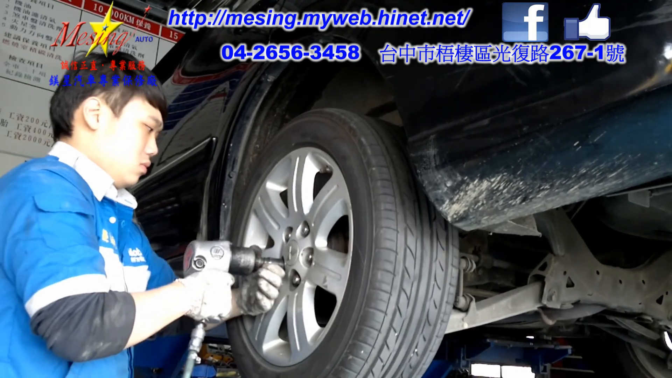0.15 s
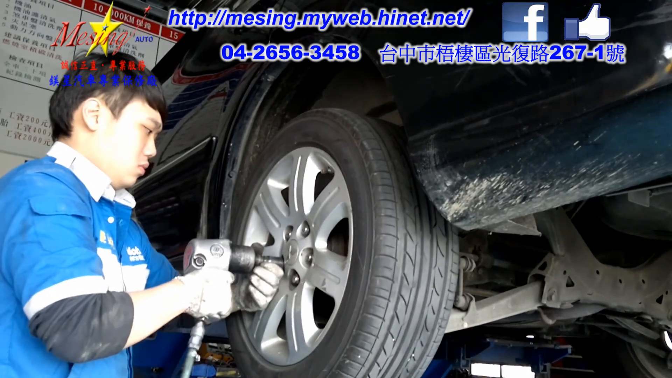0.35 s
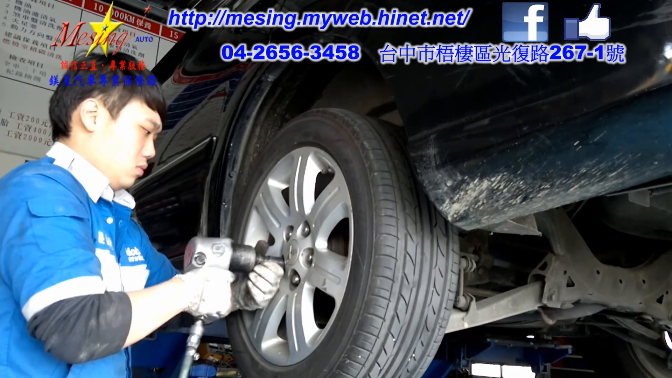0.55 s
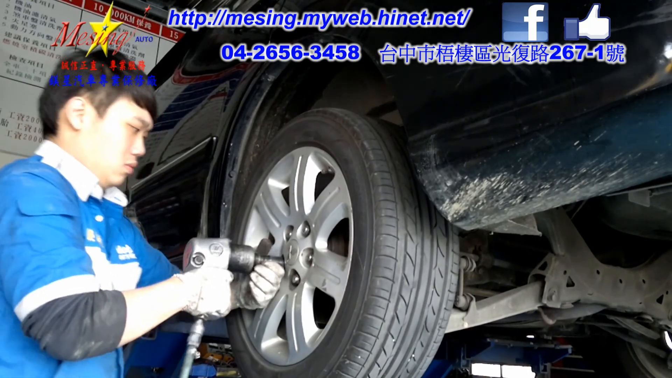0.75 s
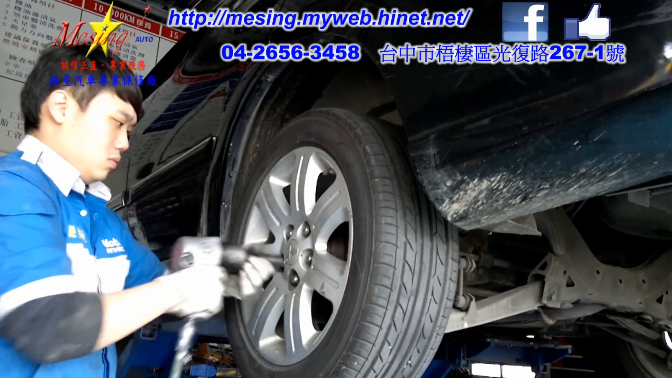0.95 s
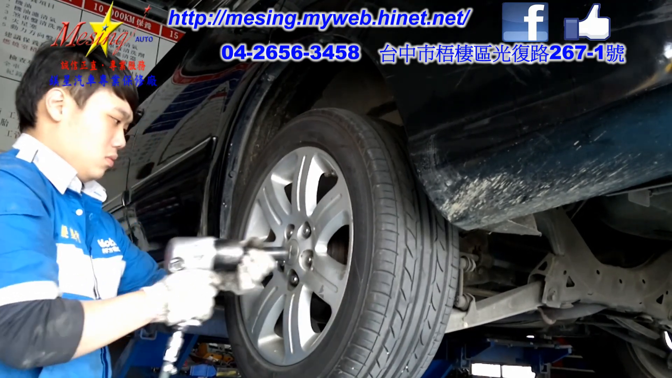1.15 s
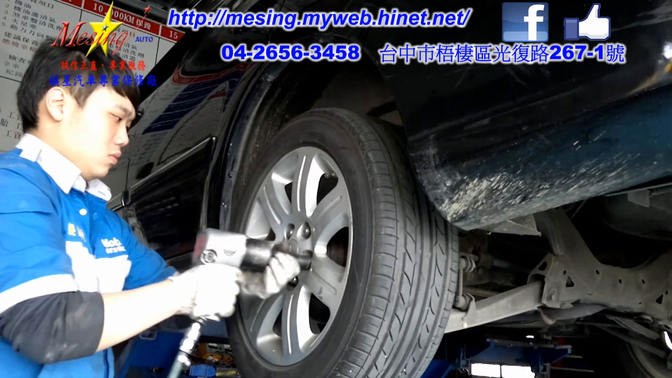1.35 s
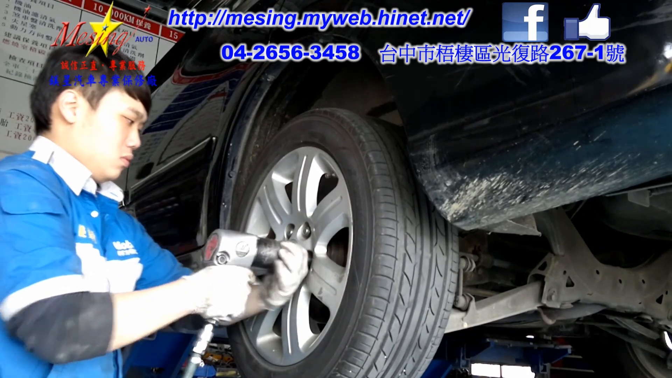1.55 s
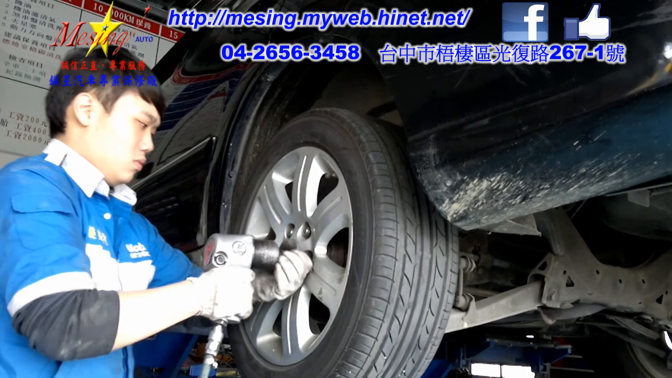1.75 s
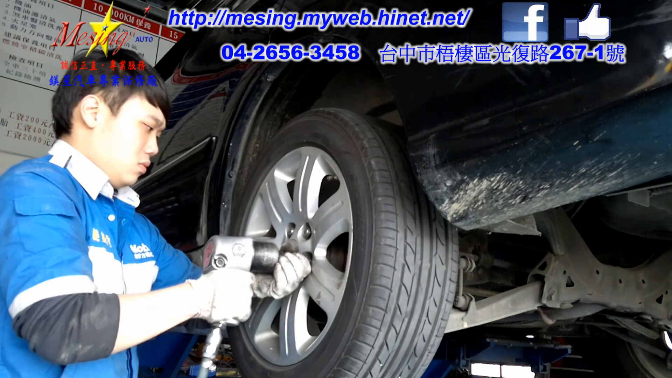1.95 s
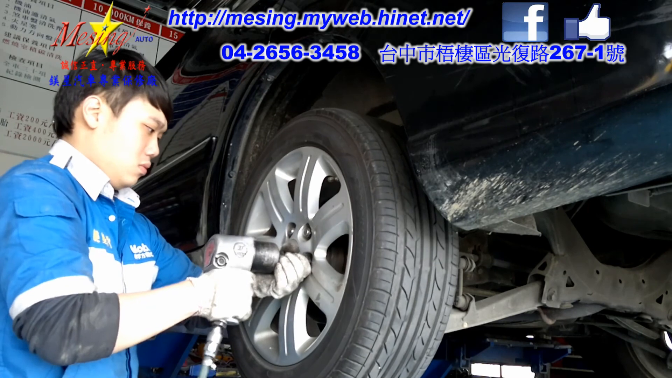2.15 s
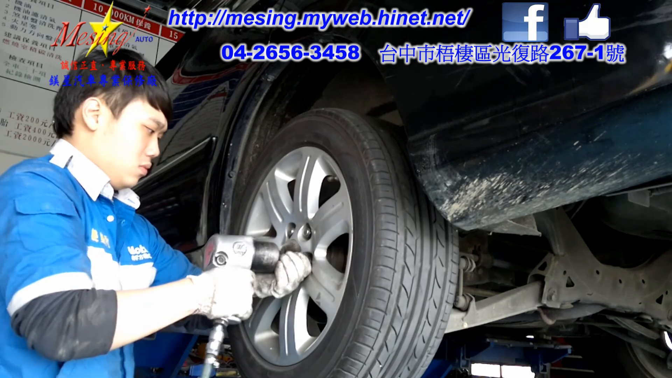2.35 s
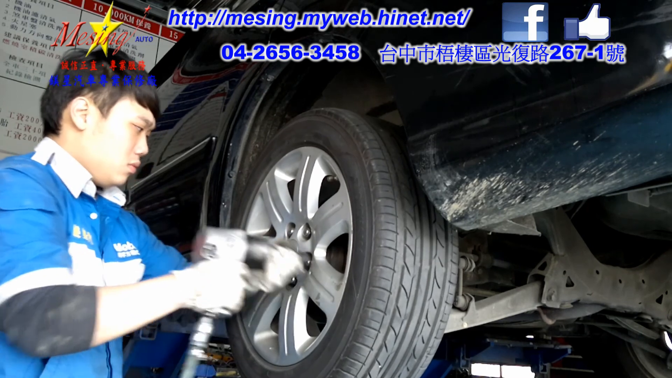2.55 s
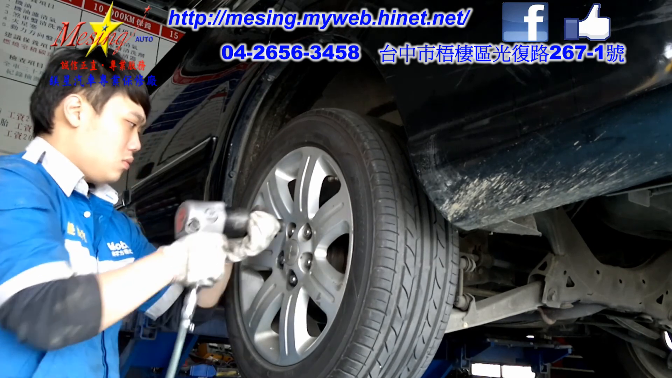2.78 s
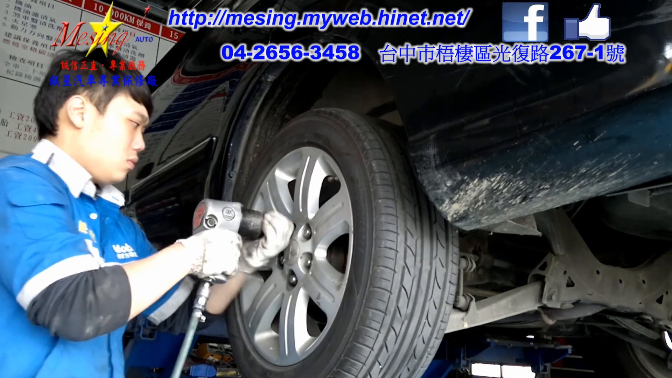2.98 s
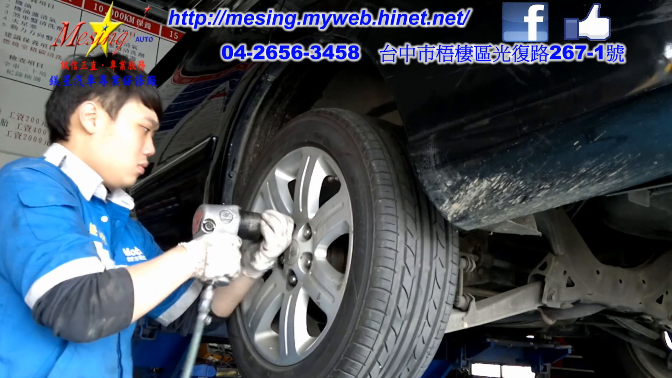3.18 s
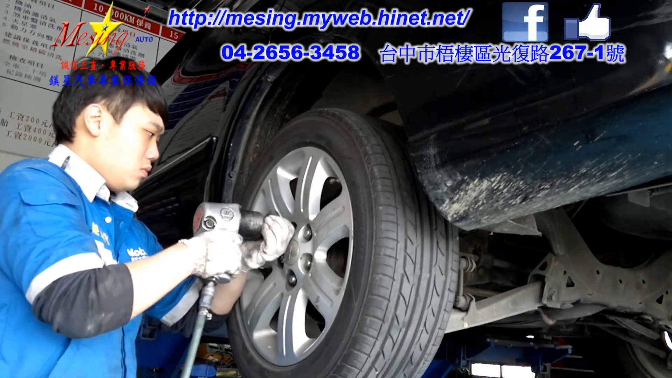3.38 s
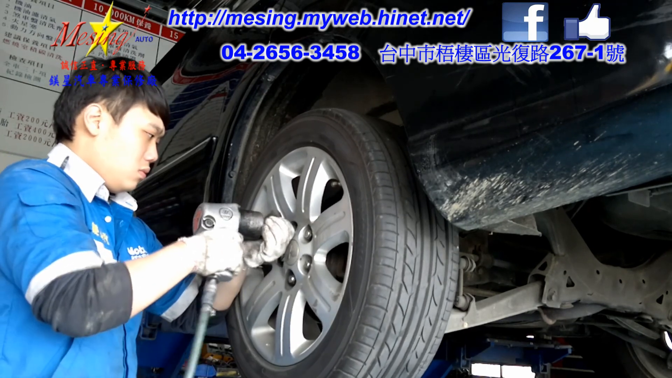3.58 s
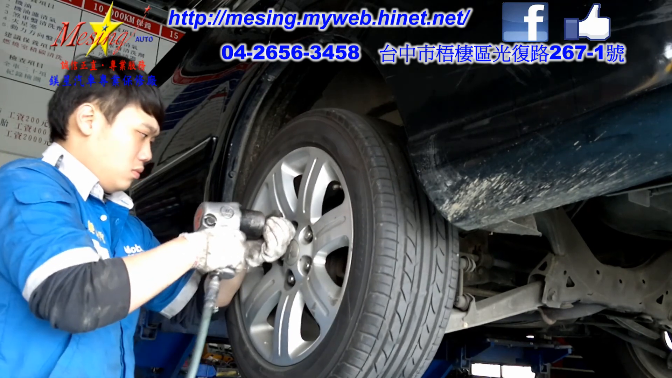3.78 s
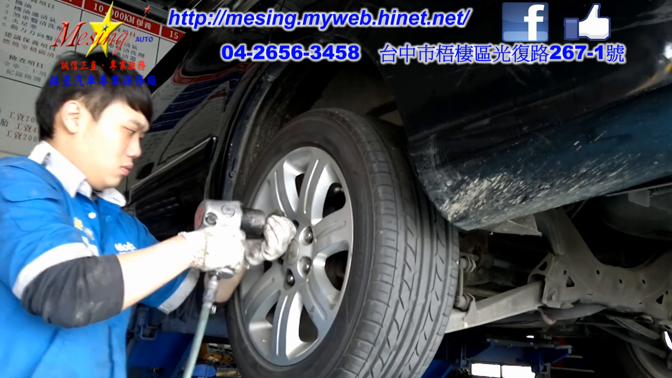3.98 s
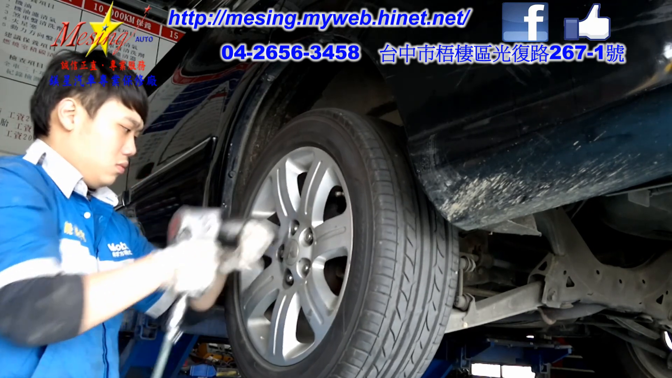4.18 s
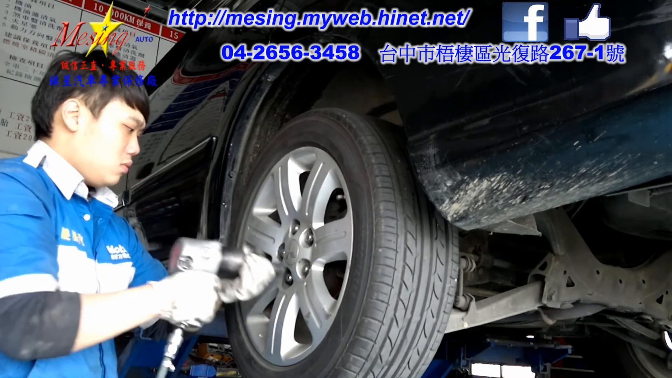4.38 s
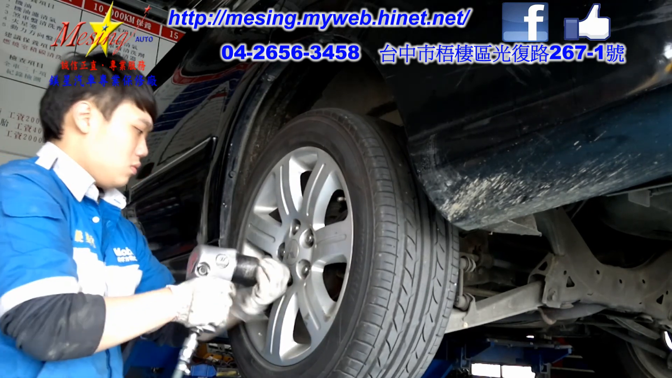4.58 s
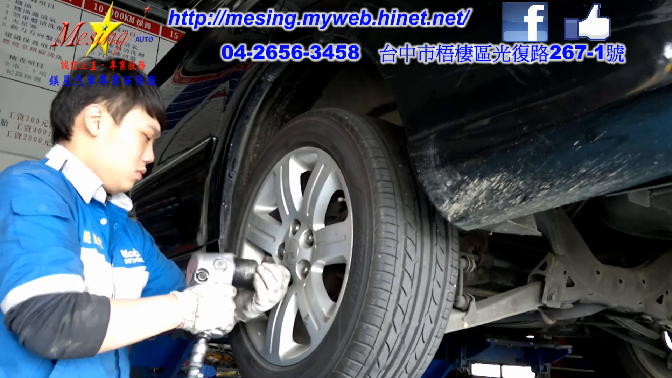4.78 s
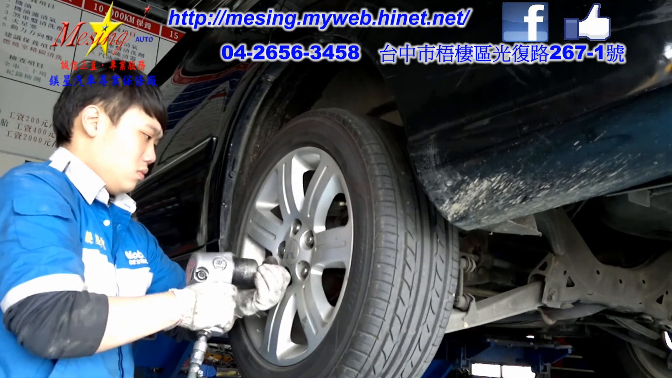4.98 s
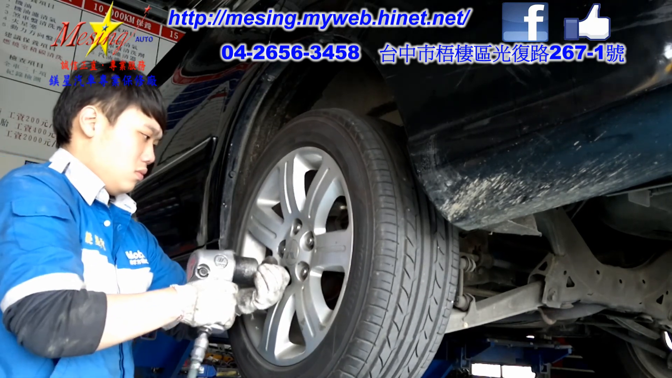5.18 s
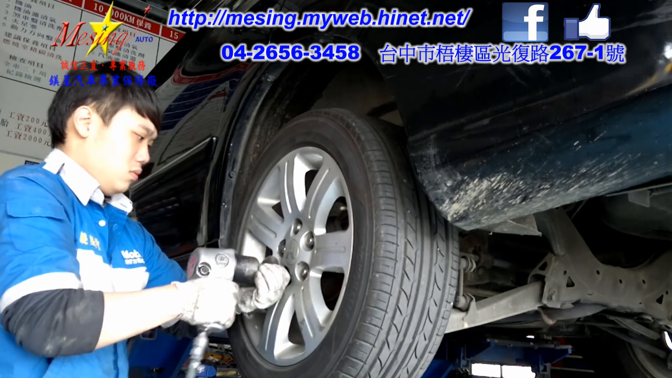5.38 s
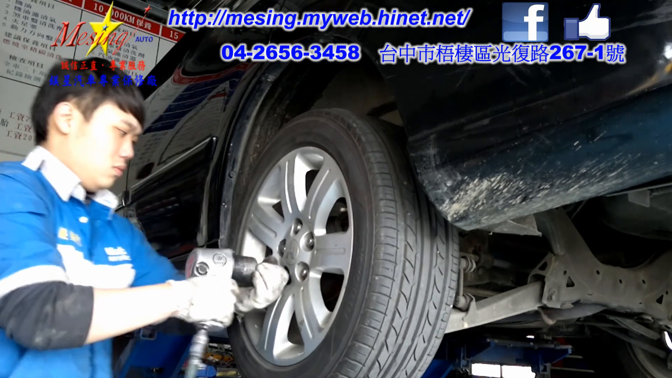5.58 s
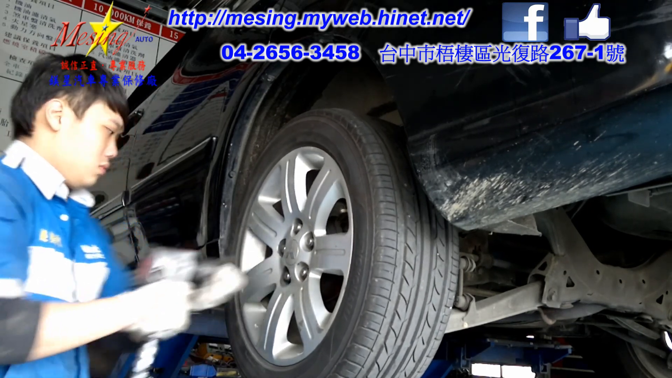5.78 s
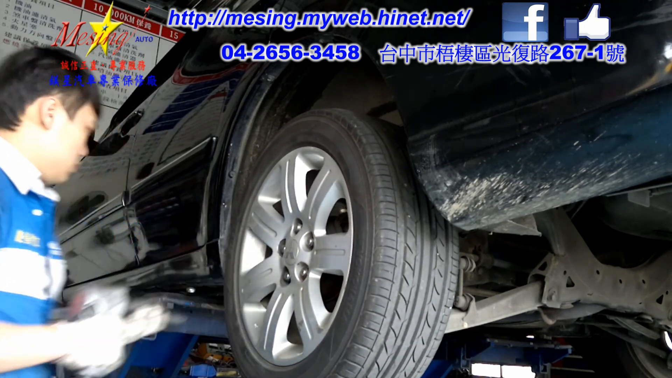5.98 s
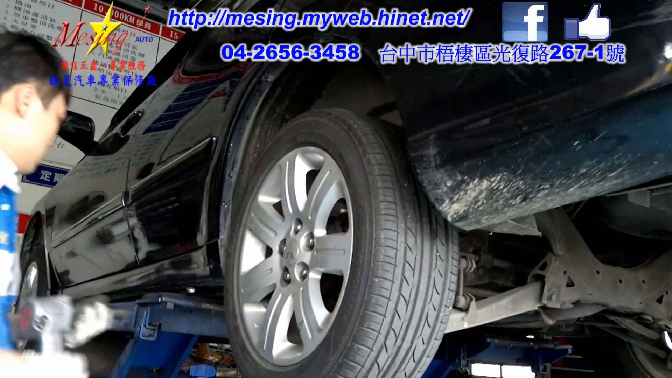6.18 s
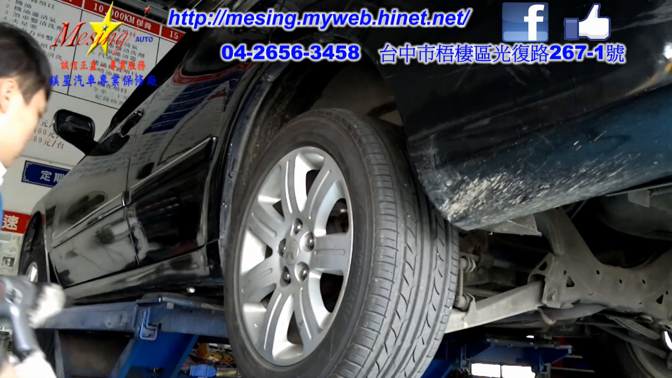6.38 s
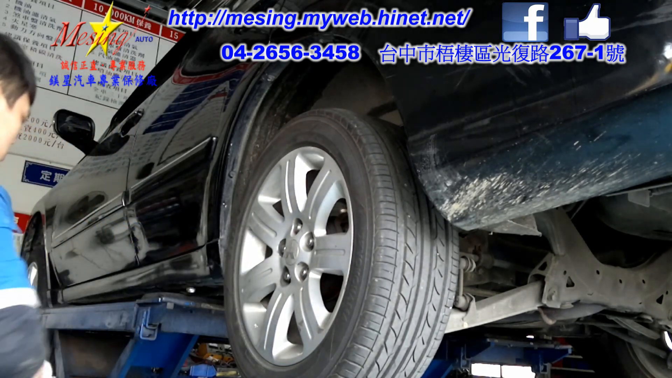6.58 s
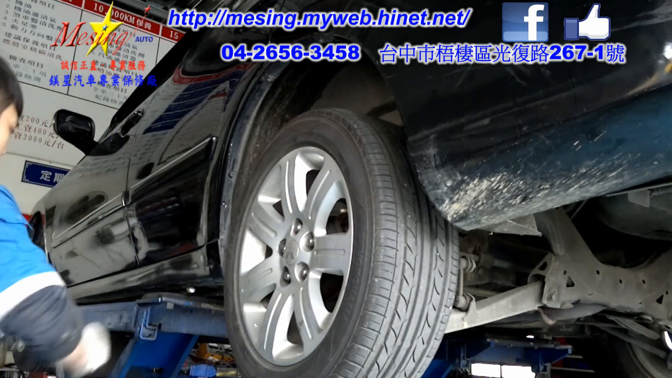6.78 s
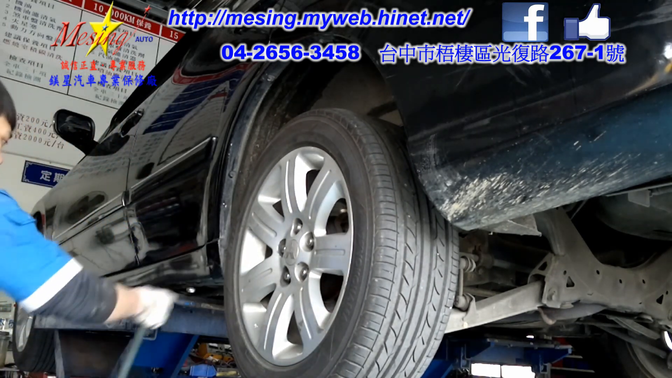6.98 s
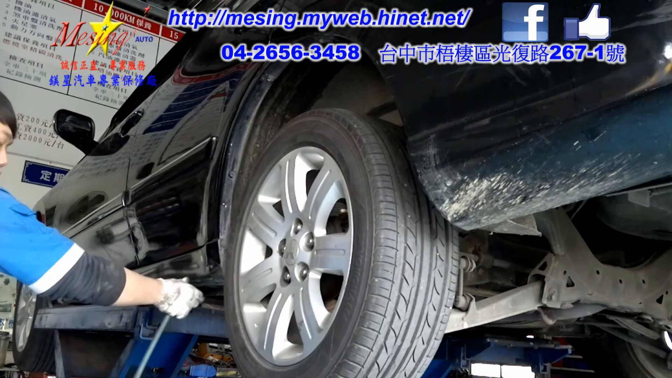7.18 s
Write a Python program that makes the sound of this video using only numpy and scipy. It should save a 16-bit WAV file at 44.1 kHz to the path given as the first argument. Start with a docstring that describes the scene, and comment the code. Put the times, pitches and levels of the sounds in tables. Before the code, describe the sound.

Close, rattling bursts from an air impact wrench thud through a car wheel and clank in the socket while exhaust air hisses. They come in four groups, separated by soft bumps and metal clinks as the tool moves to the next nut. Then a faint hiss rises and something is dragged over the floor with a sharp knock. Low background noise fills the slightly echoing garage, and moving air buffets the microphone.

```python
"""In a repair garage, over steady shop noise and a draught buffeting the microphone, a pneumatic impact
wrench runs down a wheel nut in four short trigger pulls. Exhaust air hisses while the hammer strikes about
23 times a second: each blow shudders through the wheel, clanks in the socket and rings the brake disc.
Three more nuts follow, each after dull handling bumps and the clink of the socket being seated.
At the end a faint hiss comes up, then something is dragged over the floor and knocks."""
import sys
import numpy as np
from scipy import signal
from scipy.fft import rfft, irfft, next_fast_len
from scipy.io import wavfile
from scipy.ndimage import map_coordinates

SR = 44100
rng = np.random.default_rng(int(sys.argv[2]) if len(sys.argv) > 2 else 0)


def waveform_to_disk(signal):
    """Save audio, clipped to [-1, 1], as 16-bit WAV at the path in sys.argv[1]."""
    frames = np.transpose(np.atleast_2d(signal))
    scaled = np.clip(frames, -1, 1) * 32767
    samples = np.round(scaled).astype(np.int16)
    wavfile.write(sys.argv[1], SR, samples)


N = 319284
T = np.arange(N) / SR
TOP_HZ = 10650  # upper band limit

# trigger pulls: (start [s], release [s], exhaust level [dB], first blow [s], blow rate [Hz],
# thud level [dB], clank level [dB], weakening [dB per blow])
TRIGGER_PULLS = [(-.02, 0.319, -20, .024, 25.3, -10.5, -10, 0.83),
                 (0.403, .522, -18, .429, 22, -10, -8.5, 4),
                 (0.606, 0.716, -20.5, .613, 20.8, -14, -11.5, -1.5),
                 (0.756, 0.889, -22, .788, 19.5, -10.5, -12, -0.2),
                 (1.724, 1.965, -19.5, 1.749, 21.5, -10.5, -10, 0.06),
                 (2.056, 2.18, -20, 2.063, 21.5, -7.5, -8, 2),
                 (2.232, 2.33, -21.5, 2.242, 19, -9.5, -10, 1),
                 (2.393, 2.538, -20.5, 2.419, 22.7, -7, -9.5, 2.3),
                 (3.219, 3.493, -19, 3.249, 25.6, -11.5, -9.5, 0.4),
                 (3.577, 3.712, -18.5, 3.616, 24, -10.5, -10, 1.5),
                 (3.766, 3.861, -19.5, 3.781, 22.7, -9, -13.5, 0),
                 (3.94, 4.054, -17.5, 3.955, 25.3, -13, -11.5, 0),
                 (4.784, 5.059, -21.5, 4.823, 25.2, -10.5, -10.5, 0.35),
                 (5.117, 5.253, -21, 5.153, 26, -7, -12, 1.4),
                 (5.31, 5.409, -20.5, 5.317, 25.2, -10.5, -8.5, 0.7),
                 (5.46, 5.625, -21.5, 5.518, 25.3, -9, -7.5, 4)]
# modes of the wheel with its tyre, and of the socket and anvil: (frequency [Hz], bandwidth [Hz], level [dB])
WHEEL_MODES = [(204, 23, -11.5), (254, 28, 0.5), (290.7, 32, 0), (350.6, 16, -2.5), (473, 67, -7),
               (522, 73, -6.5), (544, 15, -2), (624, 28, 3), (681, 39, 1), (842, 45, -7), (947, 18, -3.5),
               (1045, 56, -8), (1243, 43, -5), (1414, 48, -11)]
SOCKET_MODES = [(1830, 290, -9), (2257, 72, -2.5), (2740, 94, -1.5), (2920, 190, -2.5), (2980, 137, -1),
                (3400, 90, -5), (3660, 55, 1.5), (4190, 250, -8.5), (5710, 115, -6), (7330, 220, -14.5)]
# spectra of rattling loose parts and of a hard contact: (frequency [Hz], level [dB])
RATTLE_SPECTRUM = [(60, -15), (140, -8.5), (280, 3), (700, -0.5), (1300, -6.5), (2200, -2), (4000, -5),
                   (7000, -13.5), (10500, -20)]
CRACK_SPECTRUM = [(200, -29), (900, -10), (1800, 8.5), (4000, 0), (7000, -12), (10500, -20)]
# likeness of the sound at the left and right microphone ports: (frequency [Hz], correlation [-1..1])
PORT_CORRELATION = [(60, 0.64), (270, 0.73), (600, 0.97), (1170, 0.47), (1800, -0.052), (2900, 0.56),
                    (3900, -0.46), (6000, 0.063)]


def amp(db):
    """Decibels to amplitude ratio."""
    return 10 ** (np.asarray(db) / 20)


def unit(x):
    """Normalise to rms 1."""
    return x / np.sqrt(np.mean(x ** 2) + 1e-20)


def along(points, hz):
    """Interpolate (frequency [Hz], value) points on a logarithmic frequency axis."""
    freqs, values = np.transpose(points)
    return np.interp(np.log(hz + 1), np.log(freqs), values)


def level(rows):
    """Interpolate (time [s], level [dB]) points into an amplitude envelope."""
    return amp(np.interp(T, *np.transpose(rows)))


def wobble(rate):
    """Smooth random modulation: a spline through `rate` Gaussian knots a second."""
    return map_coordinates(rng.standard_normal(int(N * rate / SR) + 4), [T * rate])


def filtered(x, response):
    """Linear filtering: multiply the spectrum by a frequency response."""
    size = next_fast_len(N + SR // 2)
    return irfft(rfft(x, size) * response(np.fft.rfftfreq(size, 1 / SR)), size)[..., :N]


def resonate(x, modes):
    """Modal superposition: drive parallel resonators, scaled so that white noise keeps its power."""
    def body(f):
        response = sum((-1) ** k * amp(db) * 1j * f * width / (hz * hz - f * f + 1j * f * width)
                       for k, (hz, width, db) in enumerate(modes))
        return response / np.sqrt(np.mean(np.abs(response) ** 2))
    return filtered(x, body)


def mid_side_gains(correlation, hz):
    """Partial coherence: weights for independent mid and side noise that set the left-right correlation."""
    angle = np.arccos(np.clip(along(correlation, hz), -1, 1)) / 2
    return np.array([np.cos(angle), np.sin(angle)])


def noise(spectrum, correlation=PORT_CORRELATION):
    """Spectral shaping: coloured, partly coherent stereo noise of rms 1."""
    def colour(hz):
        return amp(along(spectrum, hz)) * (hz < TOP_HZ) * mid_side_gains(correlation, hz)
    mid, side = filtered(rng.standard_normal((2, N)), colour)
    return unit(np.array([mid + side, mid - side]))


def strokes(events, rise, fall):
    """Power sum of (time [s], level [dB]) events that swell and decay by 60 dB in rise and fall seconds."""
    power = np.zeros(N)
    for s, db in events:
        near = slice(max(int((s - .2) * SR), 0), int((s + .3) * SR))
        t = T[near] - s
        power[near] += amp(db - 60 * np.maximum(-t / rise, t / fall)) ** 2
    return np.sqrt(power)


def impulses(events):
    """Impulsive excitation: one sharp push for each (time [s], level [dB]) event."""
    x = np.zeros(N)
    for s, db in events:
        x[round(s * SR)] += amp(db)
    return x


def add(track, s, sound):
    """Superpose a short stereo sound at time s."""
    track[:, round(s * SR):][:, :sound.shape[1]] += sound


def shop():
    """Stationary noise: the hall's steady background, with a hiss of compressed air."""
    spectrum = [(30, 3), (130, 4), (250, -0.5), (520, 5), (1000, -6.5), (1900, -7), (2400, -23),
                (2900, -11), (3800, 3), (5000, -16), (6000, -16), (8000, -52), (10500, -54)]  # shop noise: (frequency [Hz], level [dB])
    return amp(-47) * noise(spectrum)


def draught():
    """Turbulent pressure fluctuations: lumps of moving air rumble on the microphone ports."""
    spectrum = [(15, -7), (35, -3.5), (65, -1), (110, -9), (170, -15.5), (300, -21), (800, -74)]  # wind rumble: (frequency [Hz], level [dB])
    gusts = [(0, -31.5), (.12, -21), (.34, -26.5), (.56, -20.5), (.75, -34.5), (1.22, -35.5), (1.4, -39),
             (1.72, -25), (1.8, -38), (2.75, -42), (3.2, -29.5), (3.35, -41), (4.3, -46), (4.75, -36.5),
             (5.85, -51.5), (6.55, -32), (6.9, -36), (7.2, -24.5)]  # strength of the draught: (time [s], level [dB])
    buffet = unit(amp(2.2 * wobble(24)) * noise(spectrum, correlation=[(50, 0.46)]))
    return amp(1.5) * level(gusts) * buffet


def garage(x, build_up_s=0.013):
    """Reverberation: the hall's diffuse tail decays exponentially, each frequency at its own rate."""
    decay_times = [(100, 0.42), (500, 0.61), (1500, 0.61), (3500, 0.69), (6000, 0.55), (10000, 0.38)]  # the hall's reverberation: (frequency [Hz], T60 [s])
    hz, t, spectra = signal.stft(rng.standard_normal((2, SR)), SR, nperseg=256)
    mid, side = spectra * mid_side_gains(PORT_CORRELATION, hz)[:, :, None]
    fade = amp(-60 * t / along(decay_times, hz)[:, None]) * (1 - np.exp(-t / build_up_s))
    tail = signal.istft(np.array([mid + side, mid - side]) * fade, SR, nperseg=256)[1]
    return signal.fftconvolve(x, tail / np.linalg.norm(tail[0]), axes=1)[:, :N]


def scatter(x, t60, share):
    """Early reflections: wheel arch and body panels add a quick spray, different at each port."""
    t = np.arange(SR // 20) / SR
    spray = rng.standard_normal((2, len(t))) * amp(-60 * t / t60)
    spray /= np.linalg.norm(spray, axis=1, keepdims=True)
    return x + share * signal.fftconvolve(x, spray, axes=1)[:, :N]


def handling(cutoff_hz=450):
    """Soft contact excites only low modes: dull bumps as the tool is moved between nuts."""
    bumps = [(1.179, -30), (1.241, -28.5), (1.547, -33), (1.703, -25.5), (3.085, -30), (4.635, -32.5)]  # soft pushes: (time [s], level [dB])
    modes = [(70, 35, -0.5), (131, 83, -1), (214, 49, -5)]  # their resonances: (frequency [Hz], bandwidth [Hz], level [dB])
    push = signal.sosfilt(signal.butter(3, cutoff_hz, fs=SR, output="sos"), impulses(bumps))
    return resonate(amp(25) * push, modes)


def dragging():
    """A faint hiss comes up; then friction noise: a dragged thing rolls, scrapes, swishes and knocks."""
    # spectra of scraping on concrete, of rolling and of the bright noise: (frequency [Hz], level [dB])
    scrape_spectrum = [(60, -7), (150, -3.5), (380, -4.5), (520, 2.5), (700, 4), (850, -3), (2000, -0.5),
                       (2500, -9.5), (3800, -7), (5000, -13.5), (7500, -24), (10500, -38)]
    roll_spectrum = [(150, -5.5), (450, -1), (650, 4.5), (900, -0.5), (1200, -4), (1650, -9.5), (2200, -30),
                     (6000, -38)]
    bright_spectrum = [(500, -21), (1800, -6), (2400, -4), (3600, 5.5), (5000, -1.5), (7000, -4.5),
                       (10500, -12.5)]
    # their envelopes: (time [s], level [dB])
    scrape_levels = [(6.2, -52.5), (6.45, -38), (6.6, -37), (6.66, -26), (6.73, -24), (6.8, -30),
                     (6.92, -25.5), (7.02, -31.5), (7.12, -26.5), (7.24, -27)]
    roll_levels = [(6.25, -69), (6.33, -49), (6.37, -32), (6.41, -32.5), (6.46, -48.5), (6.6, -39),
                   (6.8, -34)]
    bright_levels = [(5.8, -76), (5.98, -52), (6.55, -47), (6.64, -39), (6.7, -25), (6.78, -35),
                     (7.02, -46), (7.12, -34), (7.24, -47)]  # faint background hiss until 6.55 s, then the swish of dragging
    knocks = [(6.688, -9.5)]  # collision with an obstacle: (time [s], level [dB])
    scrape = level(scrape_levels) * unit(amp(1.3 * wobble(250))) * noise(scrape_spectrum)
    contact = amp(-12) * noise(CRACK_SPECTRUM) + amp(-5) * noise(RATTLE_SPECTRUM)
    knock = strokes(knocks, rise=0.0018, fall=0.056) * contact
    roll = level(roll_levels) * noise(roll_spectrum)
    hiss_then_swish = level(bright_levels) * noise(bright_spectrum)
    return amp(-1) * scrape + roll + knock + hiss_then_swish


def clank(vary_db, detune):
    """Damped free vibration of the socket; its modes vary at random, as with contact point and load."""
    t = np.arange(SR // 25) / SR
    hz, width, db = np.transpose(SOCKET_MODES)[:, :, None]
    strength, drift, lag = rng.standard_normal((3, len(SOCKET_MODES), 1))
    gain = amp(db + vary_db * strength) * width
    phase_gap = (hz / hz.mean()) ** 2 * lag  # higher modes differ more between the ports
    phase = rng.uniform(0, 2 * np.pi, lag.shape) + np.array([phase_gap, -phase_gap]) / 2
    partials = np.exp(-np.pi * width * t) * np.sin(2 * np.pi * hz * (1 + detune * drift) * t + phase)
    return np.sum(gain * partials, axis=1) / np.linalg.norm(gain)


def seating(free_ring_hz=2910, free_ring_t60=0.077):
    """Contact excitation: pushed onto a nut, the unloaded socket clacks, rings and knocks the wheel."""
    # contacts: (time [s], clink level [dB], knock level [dB], upper cutoff [Hz], free ring level [dB])
    contacts = [(1.391, -22.5, -26, 3500, -41), (1.462, -32.5, -43, 3970, -46),
                (1.592, -26, -37, 3500, -30), (1.608, -27, -22.5, 5300, -21.5),
                (2.979, -22.5, -41, 3100, -31.5), (3.132, -30, -33.5, 3830, -44),
                (4.543, -26.5, -36, 3560, -39), (4.558, -22, -33.5, 3520, -29),
                (4.665, -38, -37.5, 3500, -46)]
    clacks = np.zeros((2, N))
    t = np.arange(SR // 5) / SR
    fade = amp(-60 * t / 0.018) + amp(-0.5 - 60 * t / 0.33)  # a dry clack that rattles out
    free_ring = amp(-60 * t / free_ring_t60) * np.sin(2 * np.pi * free_ring_hz * t)
    for s, db, _, cutoff_hz, ring_db in contacts:  # each contact has its own brightness
        rattle = fade * (rng.standard_normal(len(t)) + 0.71 * rng.standard_normal((2, len(t))))
        band = signal.butter(2, [1100, cutoff_hz], "bandpass", fs=SR, output="sos")
        add(clacks, s, amp(db - 4.5) * signal.sosfilt(band, rattle))
        add(clacks, s, amp(db + 1.5) * signal.sosfilt(band, clank(vary_db=-1.5, detune=0.013)))
        add(clacks, s, amp(ring_db) * free_ring[None])
    knocks = [(s, db) for s, _, db, *_ in contacts]
    shake = strokes(knocks, rise=.002, fall=0.18)
    drive = amp(18.5) * impulses(knocks) + amp(-3.5) * shake * rng.standard_normal(N)
    return clacks + resonate(drive, WHEEL_MODES) + amp(-6.5) * shake * noise(RATTLE_SPECTRUM)


def exhaust(opening_s=0.02, run_down_t60=0.26, surge_db=1.14):
    """Jet noise: air leaves the vane motor while the trigger is held and fades as the rotor runs down."""
    spectrum = [(60, -27), (140, -2), (300, -3), (650, 1), (1400, -2.5), (2000, 0.5), (2800, -2.5),
                (4000, 3.5), (5000, -5), (5800, -5), (7500, -7.5), (10500, -12.5)]  # exhaust hiss: (frequency [Hz], level [dB])
    flow = np.zeros(N)
    for start, release, db, *_ in TRIGGER_PULLS:
        valve = np.clip((T - start) / opening_s, 0, 1)
        loss_db = 60 * np.clip((T - release) / run_down_t60, 0, 2)
        flow = np.maximum(flow, valve * amp(db - loss_db))
    return flow * amp(surge_db * wobble(130)) * noise(spectrum)


def brake_disc(drive):
    """Sympathetic resonance: the lightly damped disc and hub ring on after each impact."""
    modes = [(625, 33, -16), (671, 8.6, -4), (834, 11, -11), (1620, 7.2, -15), (1807, 15, 1),
             (2650, 20, -4.5), (2862, 60, -7.5), (3310, 16, -7), (3490, 20, 2.5), (3750, 16, 7),
             (4370, 13, 1), (5400, 14, -5)]  # disc and hub: (frequency [Hz], bandwidth [Hz], level [dB])
    return resonate(drive, modes)


def tyre(x, corner_hz=400):
    """Driving-point dependence: each nut's place on the rim sets how strongly the tyre booms."""
    boom_levels = [(.9, -5.5), (1.7, 1.5), (2.0, -7), (2.6, -7.5), (3.2, 0), (4.1, -6.5), (4.8, -1.5),
                   (5.6, -4.5)]  # gain below the corner: (time [s], level [dB])
    boom = filtered(x, lambda hz: 1 / (1 + (hz / corner_hz) ** 6))
    return x + (level(boom_levels) - 1) * boom


def bites():
    """Backlash: the socket takes up its slack in one hard contact that punches the wheel with no run-up."""
    hits = [(1.733, -11), (1.916, -14.5), (2.044, -12.5), (2.229, -12), (2.394, -11), (3.233, -9),
            (3.574, -13.5), (3.958, -13.5), (4.797, -16.5), (4.808, -11)]  # hard contacts: (time [s], level [dB])
    punch = strokes(hits, rise=0.0016, fall=0.14)
    crack = amp(-5.5) * strokes(hits, rise=.002, fall=.05) * noise(CRACK_SPECTRUM)
    drive = amp(18.5) * impulses(hits) + amp(-12) * punch * rng.standard_normal(N)
    return resonate(drive, WHEEL_MODES) + amp(-3.5) * punch * noise(RATTLE_SPECTRUM) + crack


def wheel(blows):
    """Forced vibration: torque builds and lets go at each blow; the wheel thuds and loose parts chatter."""
    load = strokes(blows, rise=.13, fall=0.046)
    chatter = unit(rng.standard_normal(N) * amp(7.2 * wobble(500)))
    drive = amp(-6) * load * chatter + amp(15.5) * impulses(blows)
    rattle = amp(-6) * load * amp(3.2 * wobble(400)) * noise(RATTLE_SPECTRUM)
    return resonate(drive, WHEEL_MODES) + rattle


def socket(clanks, max_rebound_s=0.0028):
    """Elastic impact of steel on steel: a crack, a ring damped by the gloved hand, one quick rebound."""
    rings = np.zeros((2, N))
    for s, db in clanks:
        add(rings, s, amp(db + 2.5) * clank(vary_db=4.0, detune=0.018))
        rebound = s + max_rebound_s * rng.uniform(0.51, 1)
        add(rings, rebound, amp(db) * clank(vary_db=3.5, detune=0.016))
    buzz = amp(-13.5) * strokes(clanks, rise=0.015, fall=0.1) * rng.standard_normal(N)
    crack = amp(-6.5) * strokes(clanks, rise=0.0056, fall=0.02) * noise(CRACK_SPECTRUM)
    return scatter(rings, t60=0.019, share=0.13) + resonate(buzz, SOCKET_MODES) + crack


def hammer():
    """Nearly periodic impacts, one train a pull: returns blows and clanks as (time [s], level [dB])."""
    # the coasting hammer throws the slack socket against the nut: (time [s], level [dB])
    overruns = [(2.013, -16.5), (2.194, -15.5), (2.356, -18), (2.539, -12), (3.712, -11.5), (3.887, -11),
                (4.081, -8.5), (4.103, -9.5), (5.09, -17), (5.611, -9.5)]
    stall_db_per_s = 521  # the blows die away once the trigger is released
    jitter_s, uneven_db = .001, 1.0
    clank_lag_s = .0025  # the socket slams just after the wheel takes the blow
    bounce_db, bounce_spread_db = -5.5, 1.5  # the loose socket bounces once between two blows
    blows, clanks = [], list(overruns)
    for _, release, _, first, rate_hz, thud_db, clank_db, weaken_db in TRIGGER_PULLS:
        for k, (late, hard, sharp, gap, loose) in enumerate(rng.standard_normal((9, 5))):
            s = first + k / rate_hz + jitter_s * late
            loss_db = weaken_db * k + stall_db_per_s * max(s - release, 0)
            blows.append((s, thud_db - loss_db + uneven_db * hard))
            clanks.append((s + clank_lag_s, clank_db - loss_db + uneven_db * sharp))
            bounce = s + (.5 + .3 * np.tanh(gap)) / rate_hz
            if bounce < release:
                clanks.append((bounce, clank_db - loss_db + bounce_db + bounce_spread_db * loose))
    return blows, clanks


def scene():
    """Superposition of the direct sound, the hall's reverberation and the background."""
    blows, clanks = hammer()
    air = exhaust()
    thuds = tyre(wheel(blows) + bites())
    steel = socket(clanks)
    seat = seating()
    drag = dragging()
    disc = brake_disc(amp(-18.5) * steel + amp(-24) * thuds + amp(-19) * seat)
    direct = air + thuds + steel + seat + drag + disc
    into_hall = (amp(-7) * air + amp(-8) * thuds + amp(-12) * steel
                 + amp(-7) * seat + amp(-7.5) * drag + amp(-10.5) * disc)
    return direct + garage(into_hall) + handling() + draught() + shop()


def record(dry, ceiling=.85):
    """Transducer response: the left port is duller than the right; peaks saturate, the band is limited."""
    ports = [(60, -9, 3.5), (147, -1, 6), (300, 0.5, 4.5), (603, 1, 0.5), (1390, 0.5, 1), (1980, -0.5, 1),
             (2340, 3, -4), (2700, 0, 2), (3940, -6, 2.5), (4490, 2, 2), (5770, -5, 5), (7100, -11, 2),
             (11300, -24, 4)]  # microphone response: (frequency [Hz], left level [dB], right level [dB])
    left = [(hz, db) for hz, db, _ in ports]
    right = [(hz, db) for hz, _, db in ports]
    coloured = filtered(dry, lambda hz: amp([along(left, hz), along(right, hz)]))
    rounded = coloured / (1 + np.abs(coloured / ceiling) ** 4) ** (1 / 4)
    return filtered(rounded, lambda hz: hz < TOP_HZ)


dry = scene()
out = record(dry)
waveform_to_disk(out)
```